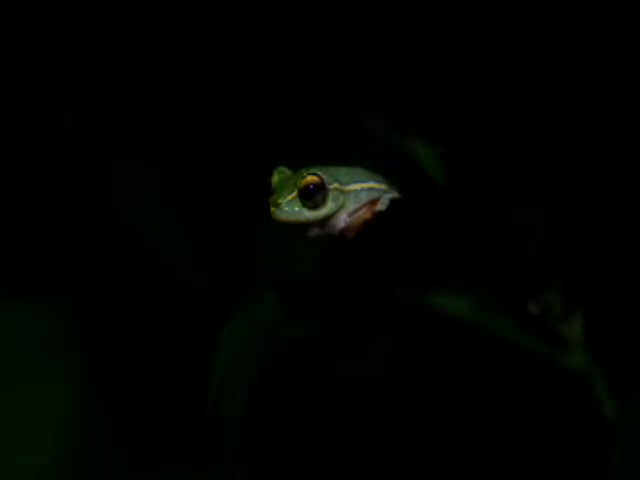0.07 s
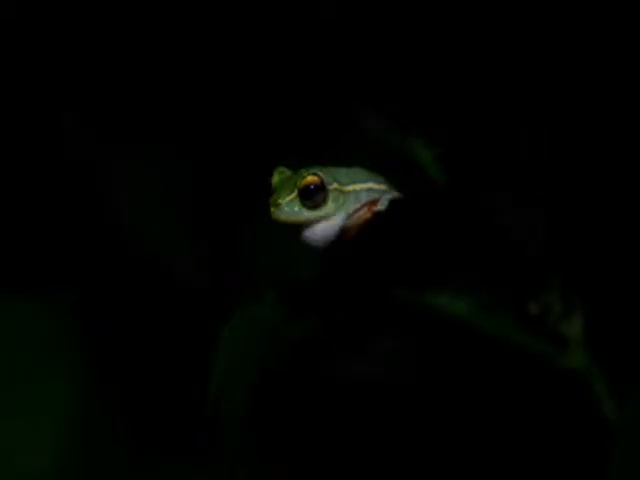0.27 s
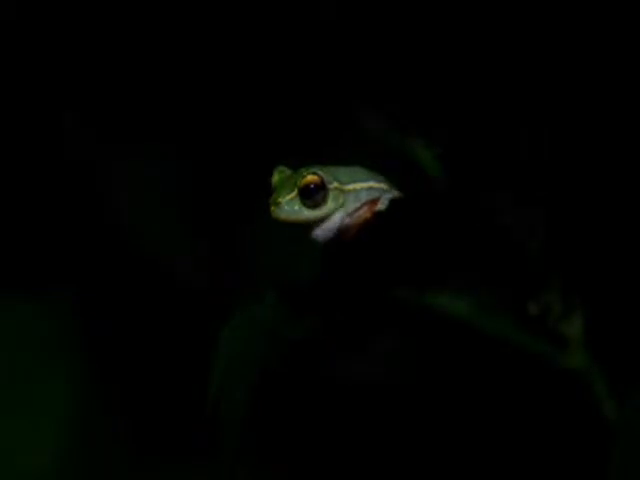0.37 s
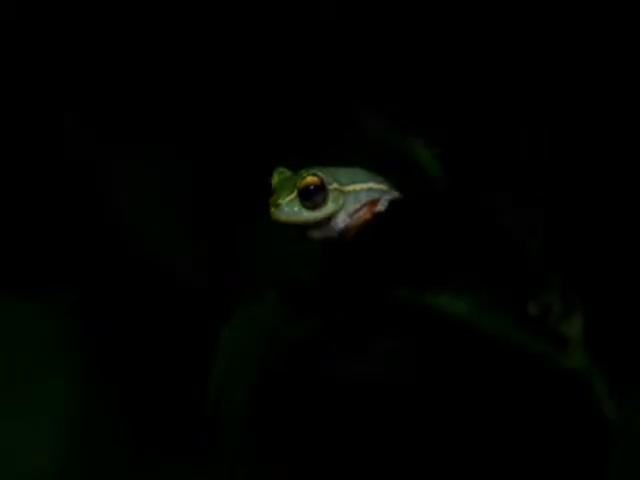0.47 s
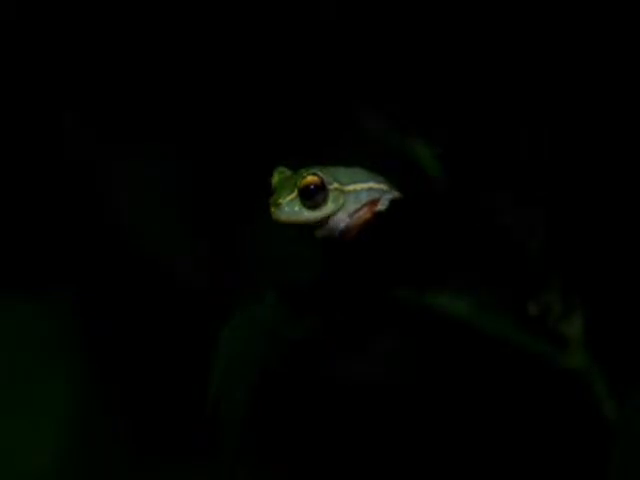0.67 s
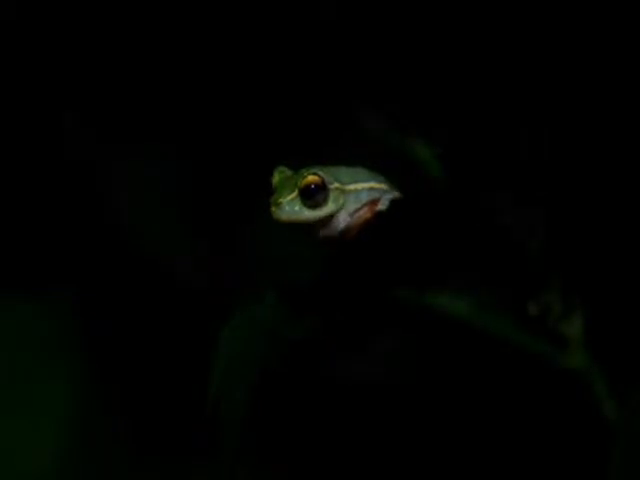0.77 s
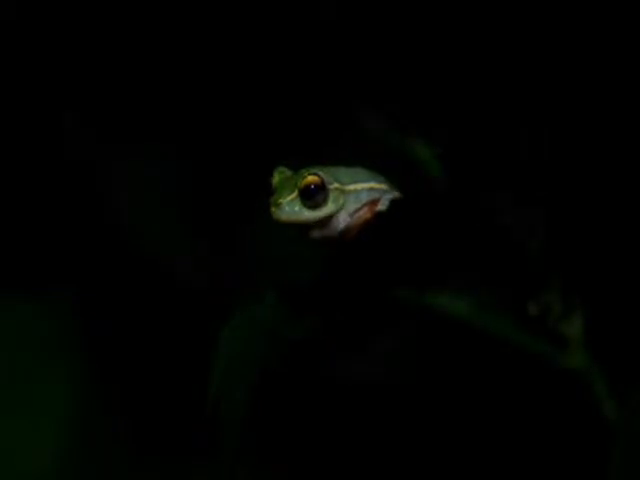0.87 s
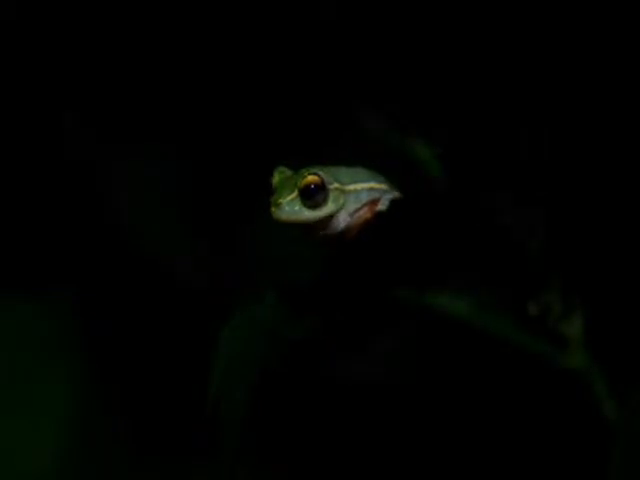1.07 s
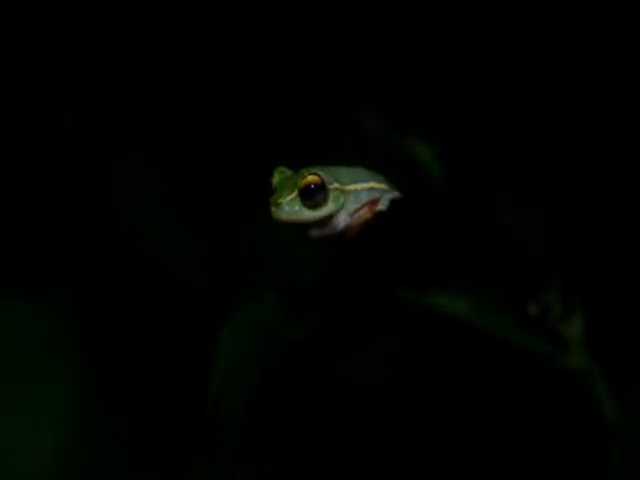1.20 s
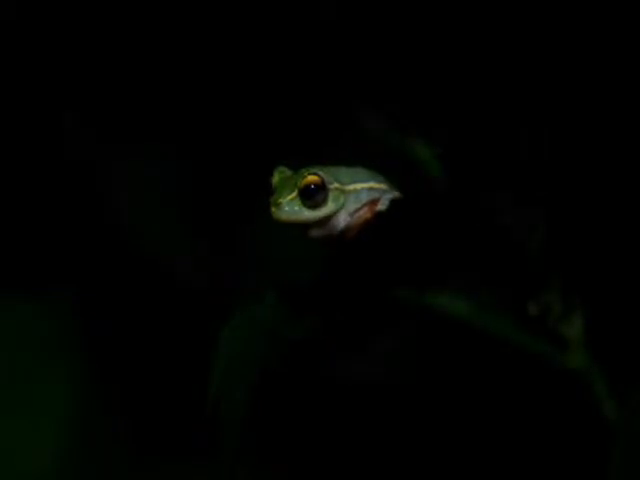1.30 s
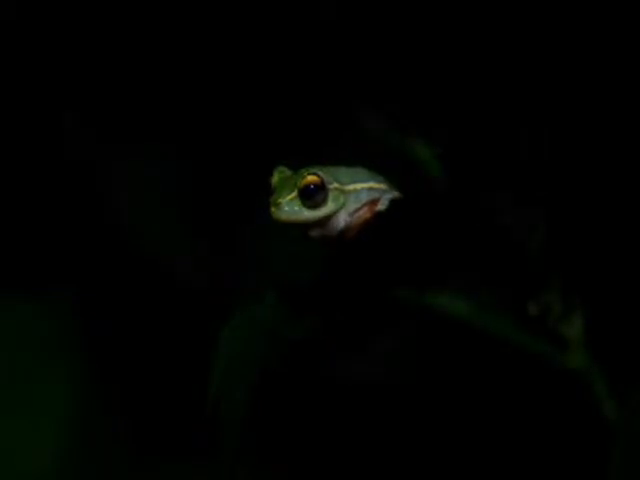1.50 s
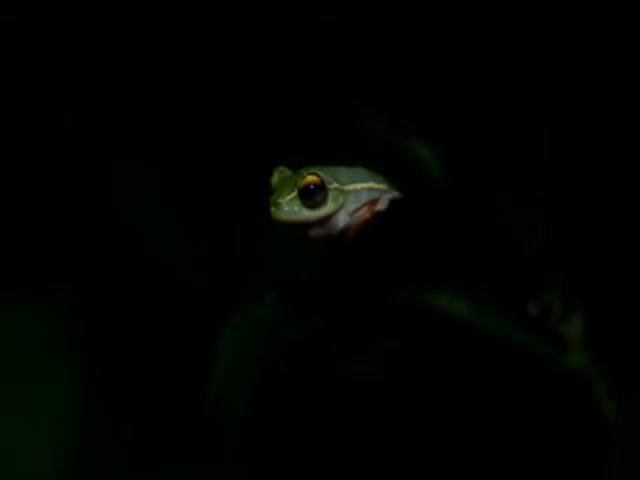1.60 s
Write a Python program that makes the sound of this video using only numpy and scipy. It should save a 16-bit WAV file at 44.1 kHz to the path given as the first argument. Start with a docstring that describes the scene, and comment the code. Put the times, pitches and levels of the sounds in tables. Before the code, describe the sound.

In a forest at night, a nearby frog gives a quick string of woody pulses with a slight echo, framed by clucks and two sharp clicks. Distant pips and a thin pulsing insect sit over a steady watery wash.

```python
"""Small frog in a night forest

A frog calls close by: a few wooden clucks around a run of even pulses, each ringing its resonances
once and thrown back by the forest. Two sharp clicks, two soft low notes and a farther frog's pips
join in, and an insect pulses high up. Underneath lies a steady wash of water and distant chorus,
made of shaped noise."""
import sys
import numpy as np
from scipy import signal
from scipy.io import wavfile
from scipy.ndimage import uniform_filter1d

SR = 44100
rng = np.random.default_rng(int(sys.argv[2]) if len(sys.argv) > 2 else 0)


def wav_out(sig):
    """Save sig, one row per channel (or a flat mono array), as 16-bit PCM at SR to the path in sys.argv[1]."""
    wavfile.write(sys.argv[1], SR, np.round(np.clip(np.atleast_2d(sig).T, -1, 1) * 32767).astype(np.int16))


N = 72765


def amp(db):
    """Decibels to gain."""
    return 10 ** (np.asarray(db) / 20)


def unit_rms(x):
    """Scales to rms 1."""
    return x / np.sqrt(np.mean(x ** 2) + 1e-20)


def curve_at(points, hz):
    """Reads a curve on a log-frequency axis."""
    freqs, values = np.transpose(points)
    return np.interp(np.log(hz + 1), np.log(freqs + 1), values)


def place(bus, start, sound, pan_db, echo_db):
    """Lays a sound on the left, right and echo-send tracks; positive pan is left."""
    span = bus[:, max(round(start * SR), 0):][:, :len(sound)]
    span += amp([[pan_db / 2], [-pan_db / 2], [echo_db]]) * sound[:span.shape[1]]


def ring(hz, swell_s, delay_s=0):
    """A resonance that swells to its peak and dies away."""
    t = np.maximum(np.arange(2048) / SR - delay_s, 0)
    return (t / swell_s * np.exp(1 - t / swell_s)) ** 2 * np.sin(2 * np.pi * hz * t)


# Stereo image of wash and echo (frequency [Hz], left-right coherence [0-1])
COHERENCE = [(50, .4), (150, .55), (300, .9), (1000, 0.87), (2500, 0.75), (4600, 0.55)]


def widen(mid, side):
    """Two partly alike channels from two unrelated spectra (bins x frames)."""
    coherence = np.clip(curve_at(COHERENCE, np.linspace(0, SR / 2, len(mid))), -1, 1)[:, None]
    mid = np.sqrt((1 + coherence) / 2) * mid
    side = np.sqrt((1 - coherence) / 2) * side
    return np.array([mid + side, mid - side])


# Tone of the wash (frequency [Hz], relative level [dB])
WASH_EQ = [(25, -27), (70, -27), (150, -25), (280, -16), (580, -2), (850, -12), (1400, -5.5), (2100, -1),
           (2800, -3.5), (3400, -4), (4200, -2), (4650, 4.5), (4950, -3.5), (5150, -31), (5600, -26.5)]
# Level of its lows over time, fuller through the middle (time [s], level [dB])
LOW_LEVEL_CURVE = [(0, -2.5), (.33, 1.8), (.45, 2), (0.801, 3.5), (1.351, 0.2), (1.55, -1.3), (1.65, -2)]
# Level of its treble over time (time [s], level [dB])
TREBLE_LEVEL_CURVE = [(0, 0.5), (.12, -2), (.25, 1), (.9, 1), (1.4, 1), (1.65, 1)]
WASH_DB, CROSSOVER_HZ = -43, 1500
PATCH_DB, SWELL_DB, WASH_LEFT_DB = 3, 1.66, 0.33


def water_and_chorus():
    """A bed of water and far chorus: noise with drifting patches and a slight swell."""
    hz, frames = np.fft.rfftfreq(1024, 1 / SR)[:, None], N // 256 + 5
    t = np.arange(frames) * 256 / SR
    mid_re, mid_im, side_re, side_im, patches = rng.standard_normal((frames, 513, 5)).T
    patches = uniform_filter1d(patches, size=7, axis=0)
    patches = unit_rms(uniform_filter1d(patches, size=6, axis=1))
    swell = unit_rms(uniform_filter1d(rng.standard_normal(frames), size=30))
    low_share = 1 / (1 + (hz / CROSSOVER_HZ) ** 2)
    ride_db = low_share * np.interp(t, *np.transpose(LOW_LEVEL_CURVE))
    ride_db += (1 - low_share) * np.interp(t, *np.transpose(TREBLE_LEVEL_CURVE))
    level_db = curve_at(WASH_EQ, hz) + ride_db + PATCH_DB * patches + SWELL_DB * swell
    spectrum = widen(mid_re + 1j * mid_im, side_re + 1j * side_im) * amp(level_db)
    bed = signal.istft(spectrum, nperseg=1024, noverlap=768)[1][:, :N]
    return amp(WASH_DB) * unit_rms(bed) * amp([[WASH_LEFT_DB], [-WASH_LEFT_DB]])


# Early reflections off leaves and trunks (delay [s], level [dB])
REFLECTIONS = [(0.011, -30.5), (0.016, -13.5), (0.0225, -30), (.0305, -29.5), (0.0469, -22)]
# Tone of the diffuse tail (frequency [Hz], level [dB])
TAIL_EQ = [(300, -17), (700, -5), (1300, -12), (1900, -8), (2600, 5), (3300, 0.5), (5000, -1)]
# Decay of the tail (frequency [Hz], time to fall 60 dB [s])
TAIL_T60 = [(400, 0.67), (1300, 0.29), (2600, 0.35), (5000, 0.29)]
PREDELAY_S, BUILD_S = 0.0052, 0.007


def forest_echo(send):
    """The forest answers with a few near reflections and a tail that dies band by band."""
    hz, t, noise = signal.stft(rng.choice([-1., 1.], (2, SR // 2)), SR, nperseg=256)
    decay_rate = np.log(1000) / curve_at(TAIL_T60, hz)[:, None]
    decay = np.sqrt(2 * decay_rate / SR) * np.exp(-decay_rate * t)  # same energy at any length
    spectrum = widen(*noise) * amp(curve_at(TAIL_EQ, hz)[:, None]) * decay
    response = signal.istft(spectrum, SR, nperseg=256)[1]
    response *= np.clip((np.arange(response.shape[1]) / SR - PREDELAY_S) / BUILD_S, 0, 1)
    for delay, db in REFLECTIONS:
        response[:, round(delay * SR)] += amp(db)
    return signal.fftconvolve(send[None], response, axes=1)[:, :N]


INSECT_START_S, INSECT_PERIOD_S, INSECT_WIDTH_S = .0565, .0746, 0.0038
INSECT_HZ, INSECT_SCATTER_HZ, INSECT_SAG_HZ_PER_S = 4585, 15, 12000


def insect():
    """Evenly spaced soft bursts of one high tone, each sagging in pitch, off to the right."""
    bus, t = np.zeros((3, N)), np.arange(-1024, 1024) / SR
    envelope = np.exp(-.5 * (t / INSECT_WIDTH_S) ** 2)
    for k, (detune, accent_db) in enumerate(rng.standard_normal((22, 2))):
        hz = INSECT_HZ + INSECT_SCATTER_HZ * detune
        burst = envelope * np.sin(2 * np.pi * (hz - INSECT_SAG_HZ_PER_S * t / 2) * t)
        start = INSECT_START_S + k * INSECT_PERIOD_S + t[0]
        place(bus, start, amp(-38.8 + accent_db) * burst, pan_db=-6.5, echo_db=-6)
    return bus


# Pips of the farther frog (time [s], level [dB], pitch [Hz])
PIPS = [(0.1407, -25, 2580), (0.5004, -26, 2540), (0.8491, -26, 2582), (1.1983, -25.5, 2562),
        (1.635, -26, 2568)]
PIP_GAP_S, PIP_STEP_DB = .0043, -2


def far_frog():
    """Each pip is four quick, fading pulses."""
    bus = np.zeros((3, N))
    for start, db, hz in PIPS:
        gap = round(PIP_GAP_S * hz) / hz  # whole cycles keep the pulses in phase
        pip = sum(amp(PIP_STEP_DB * k) * ring(hz, swell_s=0.0014, delay_s=k * gap) for k in range(4))
        place(bus, start, amp(db) * pip, pan_db=-3.5, echo_db=-2.5)
    return bus


# Soft low notes (time [s], level [dB], pitch [Hz])
SOFT_NOTES = [(0.2919, -25, 1155), (0.3108, -37, 1133)]


def soft_notes():
    """A rounded ring with a short tap on its attack."""
    bus = np.zeros((3, N))
    for start, db, hz in SOFT_NOTES:
        tap = amp(4) * ring(hz, swell_s=0.00034, delay_s=.0026)
        note = ring(hz, swell_s=0.0042) + tap
        place(bus, start, amp(db) * note, pan_db=0, echo_db=1.5)
    return bus


# Sharp clicks (time [s], level [dB], pitch [Hz], swell [s], snap [dB], thud [dB], rebound [dB],
# pan [dB], echo send [dB])
CLICKS = [(.2250, -4, 2385, 0.00086, -13.5, -15.5, -8.5, 1.5, -14),
          (1.3809, -14, 2589, 0.00057, -10.5, -14.5, -27, -1, -5.5)]
SNAP_HZ, THUD_HZ, STRIKE_SWELL_S = 3654, 1520, 0.00054


def clicks():
    """A short high ring with a bright snap, a small thud and one quick rebound."""
    bus = np.zeros((3, N))
    for start, db, hz, swell, snap_db, thud_db, rebound_db, pan_db, echo_db in CLICKS:
        snap = amp(snap_db) * ring(SNAP_HZ, STRIKE_SWELL_S)
        thud = amp(thud_db) * ring(THUD_HZ, STRIKE_SWELL_S)
        rebound = amp(rebound_db) * ring(hz, swell, delay_s=0.0038)
        click = ring(hz, swell) - snap - thud + rebound
        place(bus, start, amp(db) * click, pan_db, echo_db)
    return bus


# The close frog's resonances, which each pulse retunes, tilts and stretches
# (frequency at BODY_HZ pitch [Hz], level [dB], swell [s], polarity [+/-1])
BODY_MODES = [(800, -13, .0014, 1), (980, -23, .004, 1), (1310, .8, .0019, -1), (1340, -2, .00055, 1),
              (1850, -10.6, .0033, -1), (2650, -20, .0023, 1)]
# Its clucks and pulses (time [s], level [dB], pitch [Hz], stretch [x], brightness [dB/octave],
# knock [dB], echo send [dB])
FROG_PULSES = [(0.3873, -13.5, 1330, 1.27, -5.5, -35.5, 1.5), (0.4773, -9.5, 1218, 1.03, 4.5, -6.5, 2.5),
               (0.5207, -21, 1282, 1.2, 4, -27, -8), (0.5704, -17.5, 1312, 1.06, -1, -15.5, 3.5),
               (0.6184, -22.5, 1279, 0.95, -2, -45, 0), (0.6668, -17, 1314, 0.87, 3, -24, 2),
               (0.7165, -16.5, 1287, 0.72, 0, -23.5, 2.5), (0.7631, -17.5, 1309, 1.16, 1, -38, 2.5),
               (0.8126, -17, 1284, 1.03, -4, -21.5, 3), (0.8627, -16, 1314, 0.88, -2, -31, 1.5),
               (0.9112, -16, 1317, 1.26, -2, -21.5, 2.5), (0.9634, -12, 1343, 0.73, 3.5, -28, 2),
               (1.0157, -15.5, 1314, 0.79, -1, -32, 2.5), (1.0639, -19.5, 1269, 0.98, 7, -23.5, 1.5),
               (1.1142, -12.5, 1359, 0.77, 1.5, -12.5, 2), (1.2734, -7, 1304, 1.12, 7, -5, 2)]
BODY_HZ, KNOCK_HZ, OVERTONE_HZ = 1330, 998.4, 3023
FROG_PAN_DB, FROG_LEAD_S = .6, .000045  # slightly left: louder and earlier on that side


def close_frog():
    """Each pulse rings the frog's resonances once; a low knock stands out in the loud clucks."""
    bus = np.zeros((3, N))
    for start, db, pitch, stretch, tilt_db, knock_db, echo_db in FROG_PULSES:
        body = 0
        for hz, mode_db, swell, polarity in BODY_MODES:
            gain = polarity * amp(mode_db + tilt_db * np.log2(hz / BODY_HZ))
            body += gain * ring(hz * pitch / BODY_HZ, swell * stretch)
        knock = amp(knock_db) * ring(KNOCK_HZ, swell_s=.002 * stretch)
        place(bus, start, amp(db) * (body - knock), FROG_PAN_DB, echo_db)
        # A high overtone colours only the echo.
        overtone = amp(db - 18.5 + tilt_db + echo_db) * ring(OVERTONE_HZ, swell_s=0.00098)
        bus[2, round(start * SR):][:len(overtone)] += overtone
    bus[1] = np.roll(bus[1], round(FROG_LEAD_S * SR))
    return bus


LOW_CUT_HZ, HIGH_CUT_HZ = 657, 5600


def scene():
    """The callers and their echo over the wash; small bodies radiate little bass."""
    low_cut = signal.butter(6, LOW_CUT_HZ, "highpass", fs=SR, output="sos")
    calls = signal.sosfilt(low_cut, insect() + far_frog() + soft_notes() + clicks() + close_frog())
    direct, send = calls[:2], calls[2]
    return direct + forest_echo(send) + water_and_chorus()


def record(dry):
    """A steep high cut on the whole mix."""
    high_cut = signal.firwin(401, HIGH_CUT_HZ, window=("kaiser", 9), fs=SR)
    return signal.oaconvolve(dry, high_cut[None], "same")


dry = scene()
out = record(dry)
wav_out(out)
```